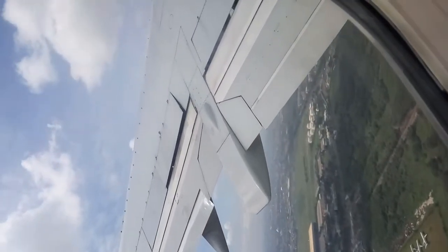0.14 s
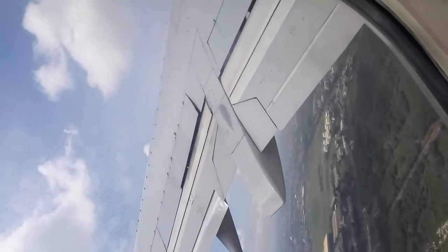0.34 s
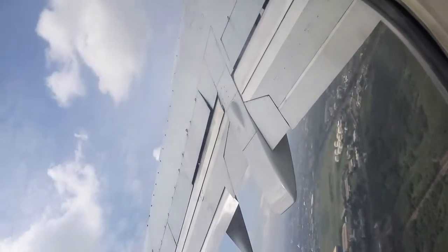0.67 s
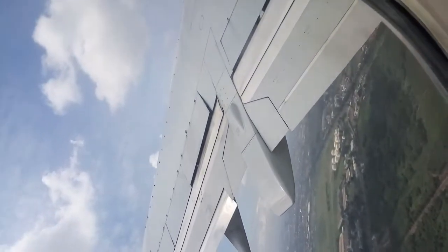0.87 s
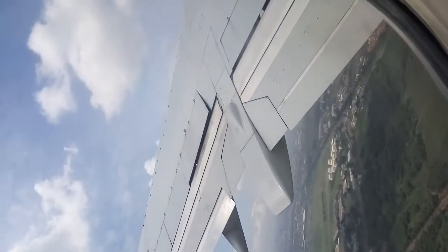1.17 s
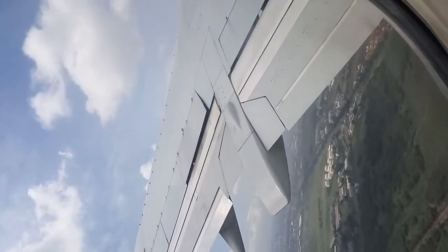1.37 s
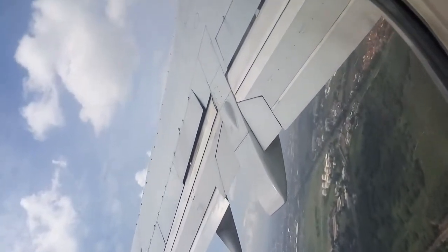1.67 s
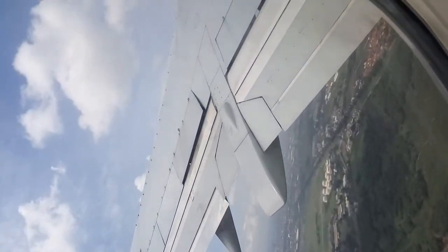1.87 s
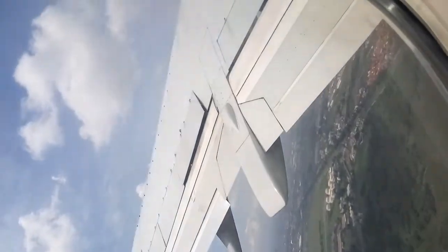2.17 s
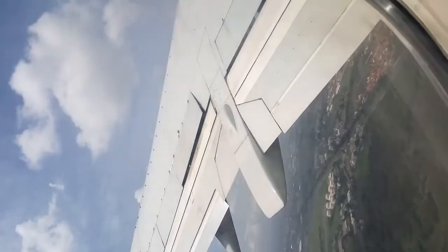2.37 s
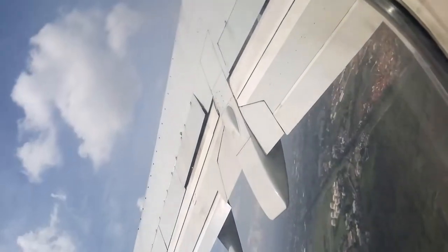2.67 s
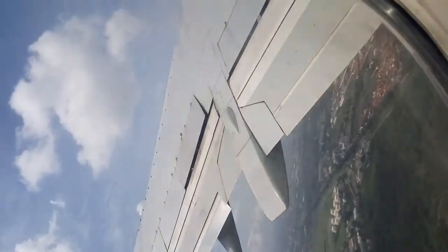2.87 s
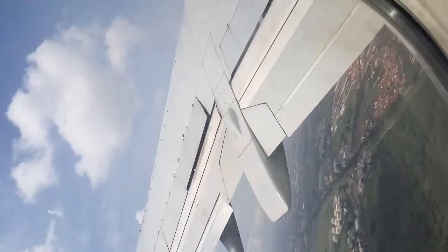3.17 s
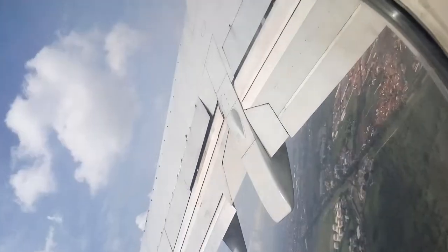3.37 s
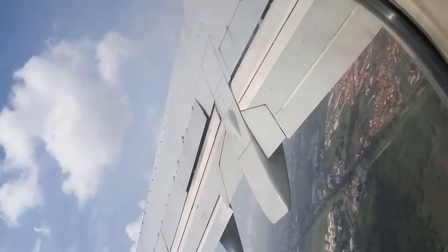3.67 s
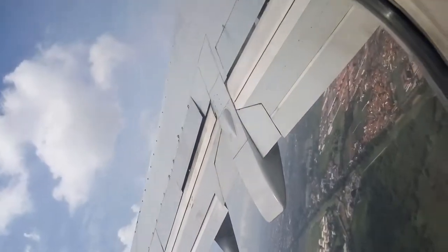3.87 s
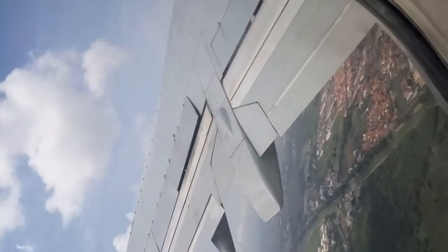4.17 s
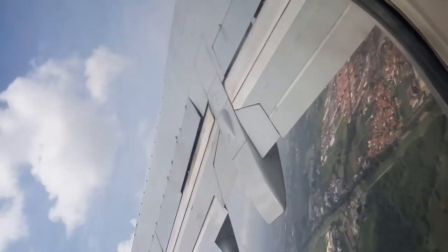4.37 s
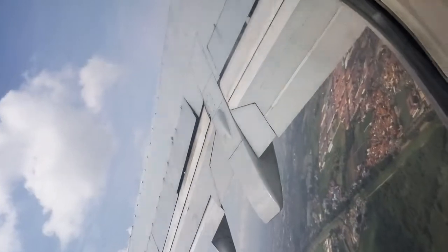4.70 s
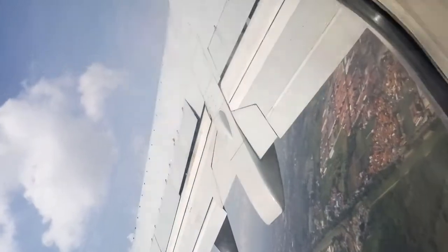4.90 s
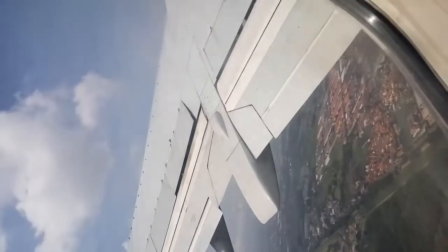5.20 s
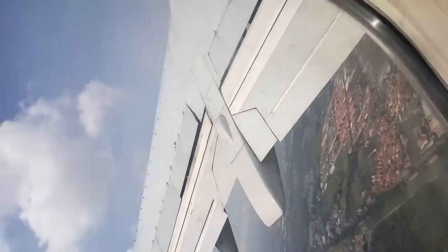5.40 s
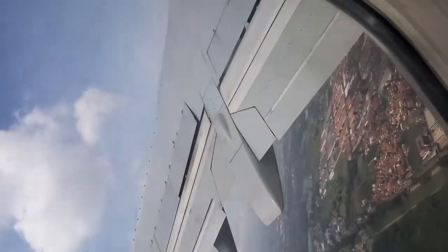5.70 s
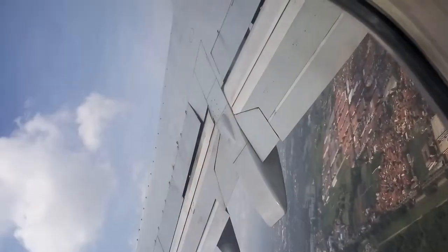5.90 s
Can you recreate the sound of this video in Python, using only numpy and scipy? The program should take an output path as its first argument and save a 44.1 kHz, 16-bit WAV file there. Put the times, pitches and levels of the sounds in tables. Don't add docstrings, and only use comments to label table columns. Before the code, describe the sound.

From a window seat in a climbing airliner, deep engine roar surges and dips over muffled air hiss, with occasional tiny squeaks and ticks.

```python
import sys
import numpy as np
from scipy import signal
from scipy.fft import rfft, irfft, next_fast_len
from scipy.io import wavfile
from scipy.ndimage import uniform_filter1d

SR = 44100
rng = np.random.default_rng(int(sys.argv[2]) if len(sys.argv) > 2 else 0)


def natural_amplitude(level_db):
    exponent = np.asarray(level_db, float) / 20
    return 10 ** exponent


def unload_wav(signal):
    wavfile.write(
        sys.argv[1],
        SR,
        np.round(np.clip(np.atleast_2d(signal).T, -1, 1) * 32767).astype(np.int16),
    )


N = 266805
TIME_S = np.arange(N) / SR


def rms_one(x):
    return x / np.sqrt(np.mean(x ** 2) + 1e-20)


def at_hz(points, hz):
    table_hz, value = np.transpose(points)
    return np.interp(np.log(hz), np.log(table_hz), value)


def over_time(points):
    return np.interp(TIME_S, *np.transpose(points))


def drift(rate_hz):
    r = np.exp(-80 * np.pi * rate_hz / SR)
    slow = signal.lfilter([1], [1, -2 * r, r * r], rng.standard_normal(N // 40 + 2002))
    slow = slow[2000:]
    return np.interp(np.arange(N) / 40, np.arange(len(slow)), rms_one(slow))


def smooth_power(x, seconds):
    window = int(seconds * SR)
    return uniform_filter1d(uniform_filter1d(np.mean(x ** 2, axis=0), window), window)


def diffuse(spectrum, peaks):
    # frequency in Hz, likeness from 0 to 1.
    likeness = [(20, .85), (46, .94), (60, .97), (110, .96), (190, .98), (260, .93), (320, .86), (370, .84),
                (440, .71), (523, .86), (622, .4), (740, .6), (880, .32), (1050, .06), (1250, .17),
                (2150, .1), (2330, .45), (2700, .45), (2900, .12), (4200, .03), (5900, .1), (8000, .03),
                (15000, .1)]
    # frequency in Hz, lead in radians.
    lead = [(20, -.1), (100, -.27), (240, -.2), (320, .15), (370, -.4), (530, -.1), (625, 1.4), (710, .2),
            (800, .4), (850, 1.2), (930, .2), (2000, -2.5), (2300, -.3), (15000, 0)]
    # frequency in Hz, left minus right in dB.
    tilt = [(32, -0.5), (46, 3.5), (77, 0.6), (110, 1.4), (130, 2.5), (185, -1.5), (261, 0.2), (311, 2.5),
            (370, 4.5), (440, 0.5), (523, -1), (622, 6), (740, -2.7), (880, 2.5), (1244, 2), (1480, -1.7),
            (2093, -4.5), (2489, -3), (2961, -1.8), (4187, -4), (4979, -2.3), (7042, -1.3), (14900, 0)]
    size = next_fast_len(N)
    hz = np.maximum(np.arange(size // 2 + 1) * SR / size, 1)
    resonance_db = sum(db / (1 + (2 * (hz - f) / width) ** 2) for f, width, db in peaks)
    colour_db = at_hz(spectrum, hz) + resonance_db

    mid, side = rfft(rng.standard_normal((2, size)))
    alike = np.clip(at_hz(likeness, hz), 0, 1)
    shared = np.sqrt(1 + alike) * mid
    own = np.sqrt(1 - alike) * side
    turn = np.exp(.5j * at_hz(lead, hz)) * natural_amplitude(at_hz(tilt, hz) / 2)
    ports = np.array([(shared + own) * turn, (shared - own) / turn])
    return rms_one(irfft(ports * natural_amplitude(colour_db), size)[:, :N])


def pings(rows, hz, t60_s):
    out = np.zeros(N)
    t = np.arange(int(.04 * SR)) / SR
    modes_hz, rings_s = np.broadcast_to(hz, len(rows)), np.broadcast_to(t60_s, len(rows))
    for row, mode_hz, ring_s in zip(rows, modes_hz, rings_s):
        at = round(row[0] * SR)
        attack = np.minimum(t / .0006, 1)
        ping = attack * natural_amplitude(row[1] - 60 * t / ring_s) * np.sin(2 * np.pi * mode_hz * t)
        out[at:at + len(t)] += ping[:N - at]
    return out


def rumble():
    # frequency in Hz, level in dB per Hz.
    roar_colour = [(11, -31), (20, -9), (27, -14.5), (38, -21), (50, -10), (71, -1.5), (85, -2.5),
                   (110, -1.5), (135, -2), (189, -2), (249, -3.5), (281, -8), (313, -5.5), (348, -15.5),
                   (392, -13), (430, -25), (560, -45.5), (950, -120)]
    # frequency in Hz, width in Hz, lift in dB.
    cabin_modes = [(155.7, 24, 4.5), (196.5, 31, 5), (246.5, 36, 3), (334, 73, 1.5), (365.7, 11, 3)]
    # time in seconds, level in dB.
    buffet = [(0, -1.5), (.3, -1), (.9, 1), (1.1, -0.5), (1.3, -3), (1.5, 1), (2.1, 3), (2.3, -2),
              (2.5, -7), (2.9, 4), (3.1, 5), (3.3, -1.5), (4.3, 4), (4.8, -0.5), (5.1, 2.5), (5.5, 1.5),
              (6.05, -3)]
    # time in seconds, level in dB.
    thrust = [(0, 0.5), (0.6, 0), (1.05, 3.5), (1.9, 2), (3.2, 1.5), (3.6, 2), (4.4, 1), (5.2, 0.5),
              (6.05, 2.5)]
    # time in seconds,
    # depth in dB.
    lulls = [(0.371, 9.5), (0.48, 7.5), (0.61, 0.5), (0.83, 4), (0.92, 3.5), (1.11, 1.5), (1.191, 5.5),
             (1.43, 8), (1.93, 3), (2.08, 5.5), (2.491, 7.5), (2.58, 3.5), (2.69, 5.5), (2.911, 1.5),
             (3.25, 4.5), (3.37, 3), (3.57, 5.5), (3.681, 5.5), (4.009, 5.5), (4.19, 2), (4.31, 2),
             (4.78, 4), (4.971, -0.5), (5.97, 3), (6.06, 3.5)]
    level_db, buffet_top_hz, buffet_evening = -3.5, 123, 0.15
    lull_fall_s, lull_rise_s = 0.031, 0.032

    roar = diffuse(roar_colour, cabin_modes)
    deep = signal.sosfiltfilt(signal.butter(4, buffet_top_hz, fs=SR, output="sos"), roar)
    heave = smooth_power(deep, .12)
    evened = (np.mean(heave) / heave) ** buffet_evening
    roar = roar + deep * (natural_amplitude(over_time(buffet)) * evened - 1)
    swing = smooth_power(roar, .07)

    lull_db = 0
    for middle_s, depth_db in lulls:
        slope_s = np.where(TIME_S < middle_s, lull_fall_s, lull_rise_s)
        lull_db = lull_db + depth_db * np.exp(-((TIME_S - middle_s) / slope_s) ** 2)
    surge_db = over_time(thrust) - lull_db
    return natural_amplitude(level_db + surge_db) * roar / swing ** 0.6


def rush():
    # frequency in Hz, level in dB per Hz.
    drone_colour = [(240, -29.5), (400, -1.5), (444, -8), (504, -6), (573, -11.5), (810, -20), (972, -22.5),
                    (1090, -22), (1300, -31), (1690, -62), (2860, -120)]
    # frequency in Hz, level in dB per Hz.
    air_colour = [(710, -33.5), (1200, -3.5), (1330, -3.5), (1440, 1), (1610, -3.5), (2080, -2.5),
                  (2840, -11.5), (3250, -12.5), (3840, -11), (4700, -16), (5710, -12.5), (8200, -29),
                  (9000, -30), (11700, -57.5), (19800, -120)]
    # frequency in Hz, width in Hz, lift in dB.
    wall_modes = [(2020, 63, 0.92), (3900, 220, 1.8), (5250, 140, 1.8)]
    # time in seconds, level in dB.
    gusts = [(0, 3.5), (.3, 0.5), (.7, 2), (.9, -1.5), (1.1, -0.5), (1.9, 2.5), (2.1, 0), (2.7, -1.5),
             (2.9, -1), (3.5, 0.5), (3.9, 0), (4.3, .5), (4.9, -3), (5.1, 1.5), (5.3, -3.5), (5.5, 2),
             (6.05, 1)]
    # time in seconds, level in dB.
    vent = [(0, 6), (.45, 0), (.7, 4), (.9, 0.5), (1.1, 0), (1.3, 0), (1.6, -0.5), (2.2, 1), (2.9, 0),
            (3.3, 1.5), (3.6, -1.5), (4.2, 1), (4.9, -1), (5.4, -1), (6.05, 3)]
    # time in seconds, lift of the drone in dB, lift of the hiss in dB.
    puffs = np.array([(.1, -0.5, -5), (.25, 3, -0.5), (.45, 2, -1.5), (.55, -1.5, -3), (.75, -2, -3),
                      (.9, 5, 2), (1.05, 2, 0), (1.149, -0.5, 0.7), (1.65, -2.5, 1.5), (2.1, -0.5, -3),
                      (2.25, 2, -0.5), (2.5, 1.5, -1), (3.05, 1, 0.5), (3.45, 2, 0), (3.6, -1, 4.5),
                      (3.75, -0.5, 2), (3.95, 0, -1), (4.45, 2.5, 1), (4.75, 3, 0), (5.15, -1.5, 2),
                      (5.3, 3.5, 1), (5.55, -0.5, 0.5), (.35, -0.3, -2), (.65, 0, -2), (.83, -1, 0.5),
                      (1.3, 2.5, 1.2), (1.45, -1.8, 0.8), (1.85, -3.5, -0.5), (1.97, 0.7, 0.5),
                      (2.38, 0.5, 0.8), (2.65, -1, -0.7), (2.8, -0.7, 1), (2.93, .3, 1.3),
                      (3.15, 2.9, -0.7), (3.27, 0.7, -1.5), (3.85, -0.7, 1.2), (4.1, .3, -2.7),
                      (4.25, -1.8, -1.5), (4.6, 0, -1), (4.9, .3, -1), (5.05, 0.5, 2.5), (5.43, -0.9, 1),
                      (5.7, -1, -0.7), (5.87, 2.7, -1.5)])
    drone_db, air_db, puff_s = -22.5, -38, 0.05

    gust_db = .2 * drift(2.0) + 0.93 * drift(27)
    drone = natural_amplitude(drone_db + over_time(gusts) + 1.2 * drift(7.8)) * diffuse(drone_colour, [])
    air = natural_amplitude(air_db + over_time(vent)) * diffuse(air_colour, wall_modes)
    bumps = np.exp(-((TIME_S - puffs[:, :1]) / puff_s) ** 2)
    low_db, high_db = puffs[:, 1:].T @ bumps
    drone, air = drone * natural_amplitude(low_db), air * natural_amplitude(high_db)

    hump = signal.sosfilt(signal.butter(2, [1500, 2350], "band", fs=SR, output="sos"), air)
    lumps = signal.sosfilt(signal.butter(2, [600, 1000], "band", fs=SR, output="sos"), drone)
    hump_flutter = (natural_amplitude(2.2 * drift(5.5)) - 1) * hump
    drone_flutter = (natural_amplitude(0.65 * drift(8.7)) - .8) * lumps
    return natural_amplitude(gust_db) * (drone + drone_flutter + air + hump_flutter)


def whine():
    # frequency in Hz, level in dB.
    blade_tones = [(2961, -74), (5925, -77)]
    turns = np.cumsum(1 + 0.0005 * drift(3.6)) / SR
    tones = sum(natural_amplitude(db + 13 + 2.5 * drift(4)) * np.sin(2 * np.pi * hz * turns) for hz, db in blade_tones)
    return tones * natural_amplitude(np.array([[-4.], [2.5]]))


def rattle():
    # start in seconds, peak in dB, mode in Hz, 60 dB decay in seconds.
    knocks = [(0.433, -52, 3400, .015), (0.477, -51, 5250, .03), (0.493, -54, 5250, .03),
              (1.441, -56, 5300, .01), (2.575, -39, 5440, 0.0068), (2.577, -48.5, 4520, .006),
              (2.577, -45, 6500, 0.0089), (0.012, -46, 5320, 0.02), (5.664, -47, 5500, 0.019),
              (1.441, -56, 7200, .004), (1.441, -60, 9000, .004), (2.577, -54, 8300, .004)]
    _, _, mode_hz, decay_s = np.transpose(knocks)
    return natural_amplitude(13.0) * pings(knocks, mode_hz, decay_s)


def squeaks():
    # start in seconds, length in seconds, pitch in Hz, level in dB.
    rubs = [
        (0.0, 0.1, 2034, -53.5),
        (0.345, .045, 1670, -57),
        (0.469, .06, 2080, -58),
        (1.0, 0.085, 2035, -51),
        (4.205, .045, 805, -40),
    ]
    out = np.zeros(N)
    tremble = natural_amplitude(1.8 * drift(60))
    for start_s, length_s, hz, db in rubs:
        t = np.arange(int(length_s * SR)) / SR
        at = max(round(start_s * SR), 0)
        swell = np.sqrt(np.sin(np.pi * t / length_s))
        out[at:at + len(t)] += natural_amplitude(db + 13.0) * swell * np.sin(2 * np.pi * hz * t)
    return out * tremble * natural_amplitude(np.array([[-6.], [3.]]))


def chirr():
    # resonance in Hz, level in dB.
    panels = [(520, -36), (800, -42), (870, -41), (1100, -52), (1400, -52.5), (1800, -53), (1950, -54),
              (2100, -52.5), (2700, -58.5), (3900, -60)]
    flares_hz, width_hz = 5.2, 25
    out, r = 0, np.exp(-np.pi * width_hz / SR)
    for hz, db in panels:
        poles = [1, -2 * r * np.cos(2 * np.pi * hz / SR), r * r]
        tone = signal.lfilter([1, 0, -1], poles, rng.standard_normal((2, N)))
        flare_db = 7.3 * np.minimum(drift(flares_hz), 1.9)
        out = out + natural_amplitude(db - 5.0 + flare_db) * rms_one(tone)
    return out


def scene():
    return rumble() + rush() + whine() + squeaks() + rattle() + chirr()


def gain_ticks():
    # time in seconds, peak in dB.
    large = [(0.2605, -64.5), (0.8599, -56), (0.9026, -72), (0.9395, -57), (1.0003, -60), (1.061, -52.5),
             (1.3204, -57), (1.4606, -62.5), (1.482, -62), (1.5604, -56), (1.7607, -58), (1.941, -64.5),
             (2.1809, -66), (2.199, -54), (2.2608, -57), (2.38, -55), (2.4194, -66), (3.36, -56),
             (3.7216, -60), (3.9005, -62), (4.0208, -57), (4.0815, -55), (4.1205, -60), (4.2417, -58),
             (4.4006, -61), (4.4822, -53), (4.8206, -53), (5.2403, -59), (5.4225, -58), (5.7995, -60)]
    clock_s, small_share, small_db, spread_db = .02, .07, -73.5, 6
    tick_hz, decay_s = 12000, .0045
    clock = np.arange(clock_s, N / SR, clock_s)
    chance, size = rng.random(len(clock)), rng.standard_normal(len(clock))
    small = np.transpose([clock, small_db + spread_db * size])[chance < small_share]
    ticks = natural_amplitude(6.5) * pings(large, tick_hz, decay_s) + pings(small, tick_hz, decay_s)
    return ticks * natural_amplitude(np.array([[-1.5], [1.5]]))


def self_noise(over_db):
    # frequency in Hz, level in dB per Hz.
    hiss_colour = [(4410, -32), (7500, 1), (8250, -9.5), (11100, -4), (12100, -6.5), (14600, -8),
                   (15300, -15)]
    duck_db = .3 * (over_db - np.mean(over_db))
    return natural_amplitude(-67.5 - duck_db) * diffuse(hiss_colour, [(12000, 500, 1.5)])


def band_limit(x):
    return signal.sosfilt(signal.butter(12, 15480, fs=SR, output="sos"), x)


def record(dry):
    ratio, knee_db, sense_s, ahead_s = 2.304, -18, 0.013, 0.016
    keep = np.exp(-1 / (sense_s * SR))
    power = np.mean(dry ** 2, axis=0)
    sensed = signal.lfilter([1 - keep], [1, -keep], power, zi=[keep * np.mean(power)])[0]
    sensed = np.interp(np.arange(N) + ahead_s * SR, np.arange(N), sensed)
    over_db = np.maximum(10 * np.log10(sensed + 1e-12) - knee_db, 0)
    wet = dry * natural_amplitude(-over_db * (1 - 1 / ratio))
    wet = wet + gain_ticks() + self_noise(over_db)

    edge_s = np.minimum(np.arange(N), np.arange(N)[::-1]) / SR
    wet = wet * (1 - .3 * np.exp(-edge_s / .004))
    excess = np.maximum(np.abs(wet) - .8, 0)
    wet = wet - np.sign(wet) * (excess - .18 * np.tanh(excess / .18))
    return band_limit(wet)


dry = scene()
out = record(dry)
unload_wav(out)
```